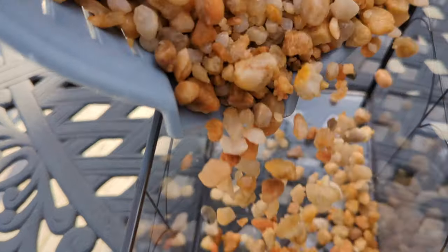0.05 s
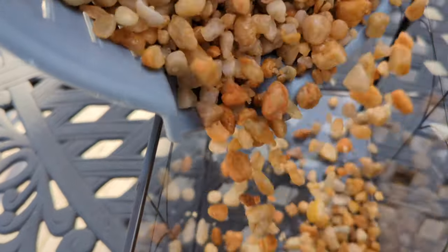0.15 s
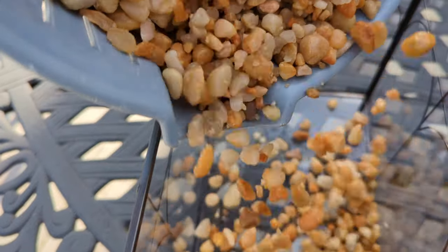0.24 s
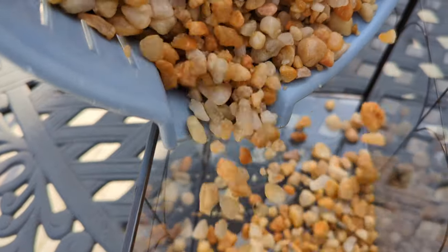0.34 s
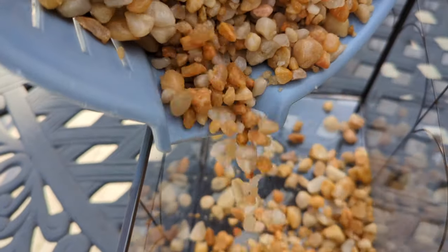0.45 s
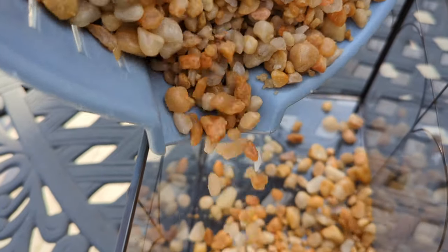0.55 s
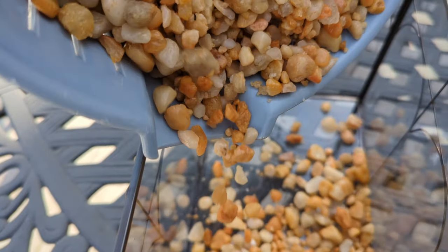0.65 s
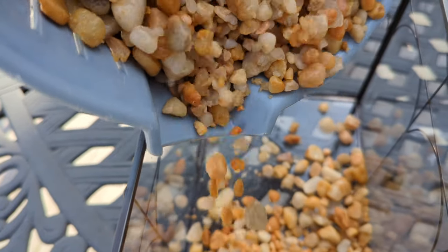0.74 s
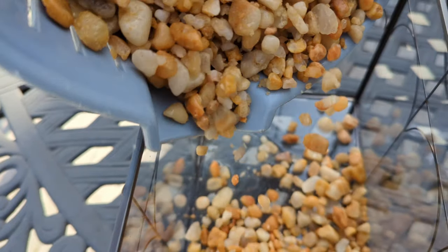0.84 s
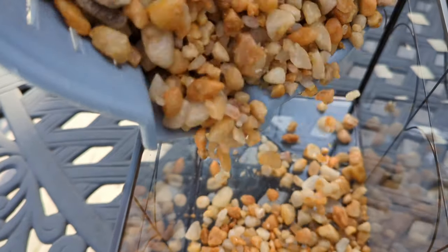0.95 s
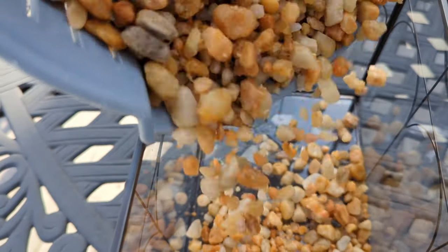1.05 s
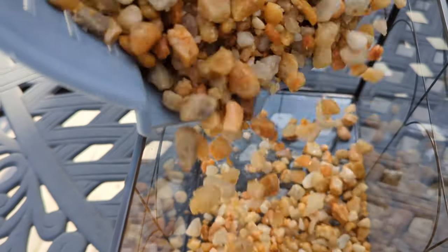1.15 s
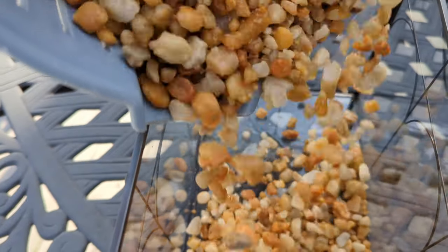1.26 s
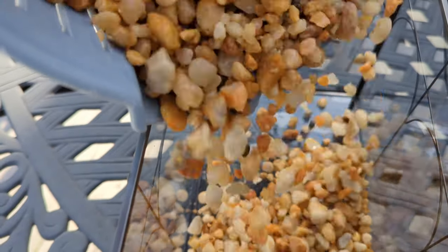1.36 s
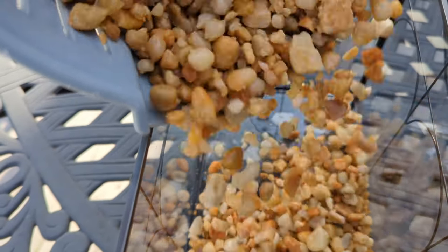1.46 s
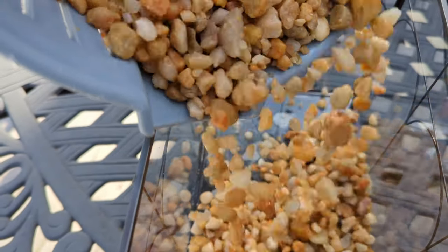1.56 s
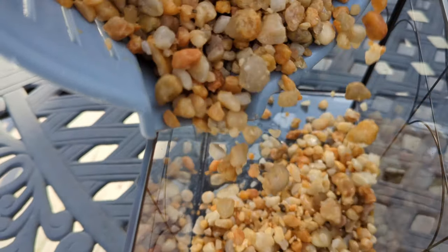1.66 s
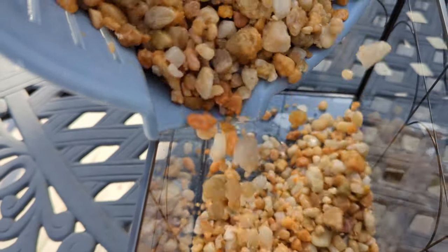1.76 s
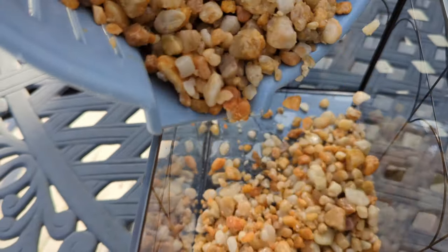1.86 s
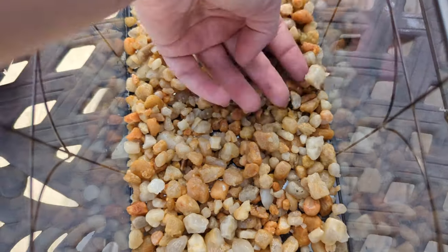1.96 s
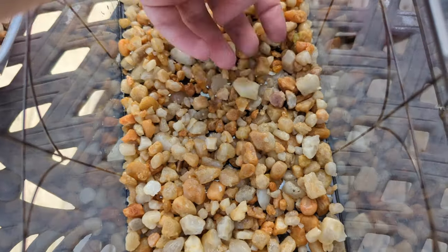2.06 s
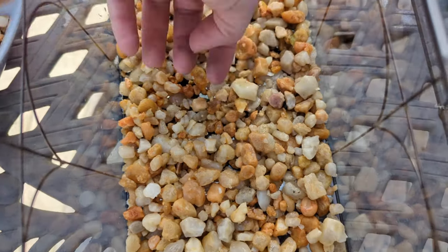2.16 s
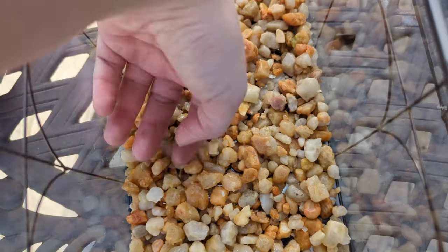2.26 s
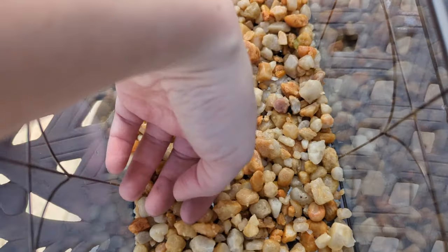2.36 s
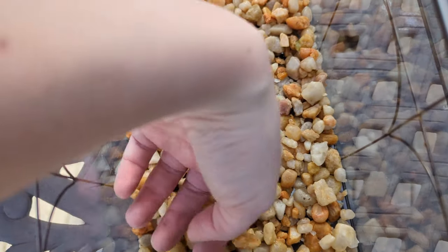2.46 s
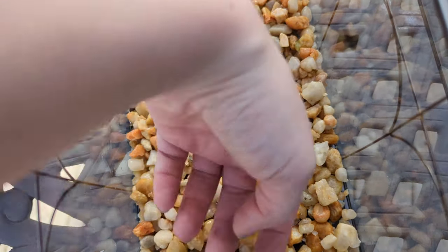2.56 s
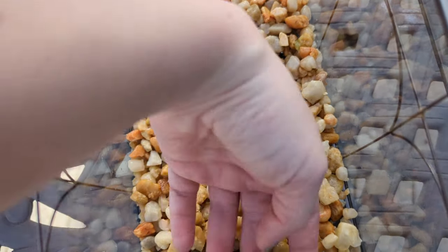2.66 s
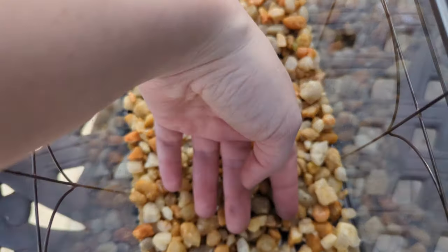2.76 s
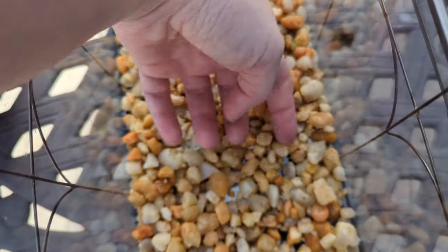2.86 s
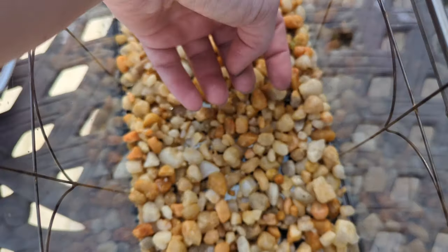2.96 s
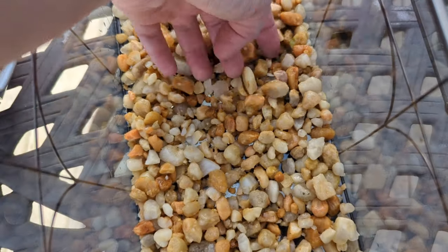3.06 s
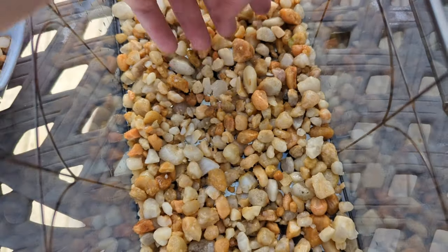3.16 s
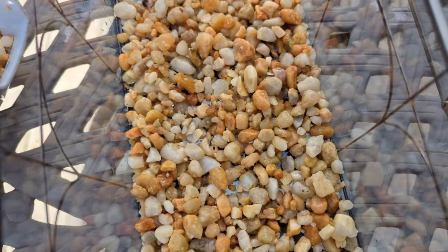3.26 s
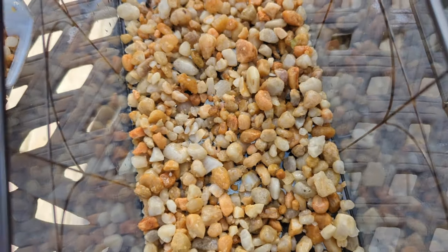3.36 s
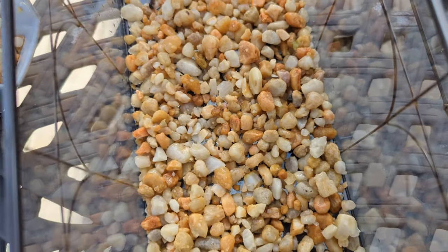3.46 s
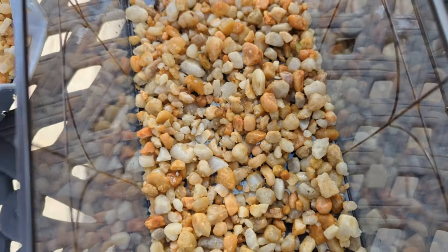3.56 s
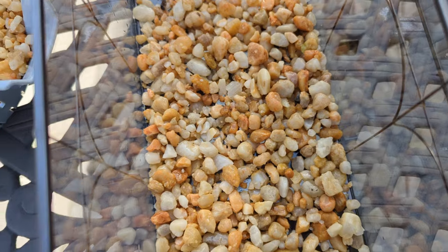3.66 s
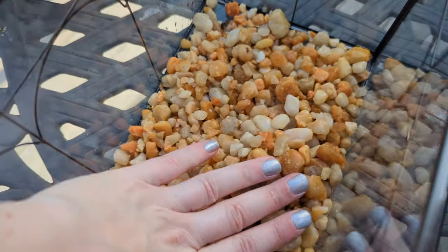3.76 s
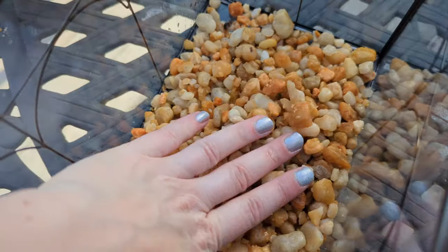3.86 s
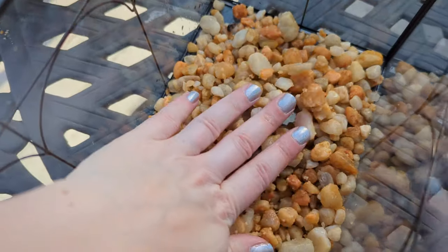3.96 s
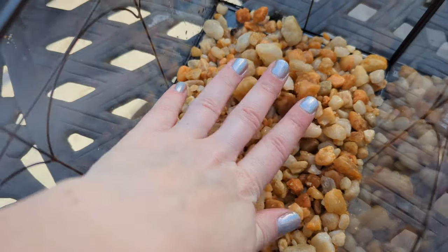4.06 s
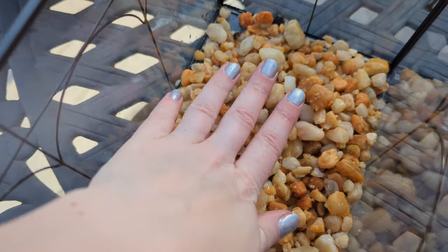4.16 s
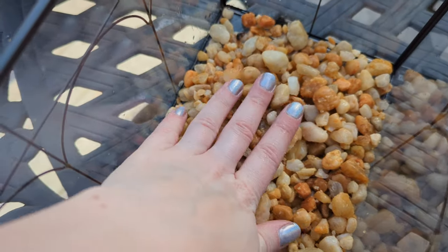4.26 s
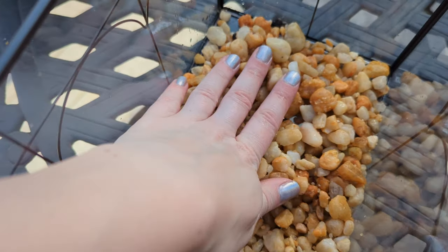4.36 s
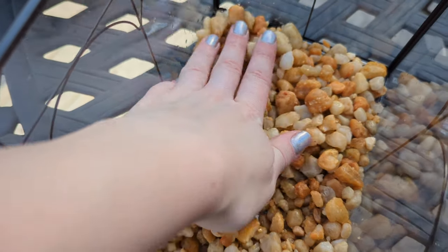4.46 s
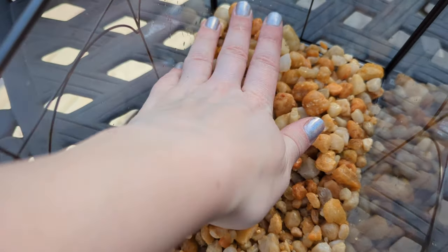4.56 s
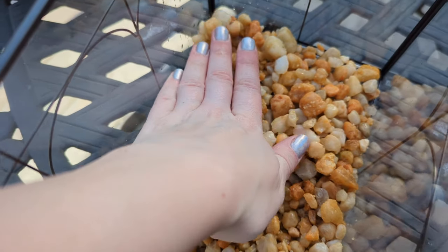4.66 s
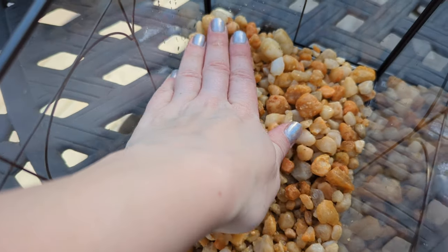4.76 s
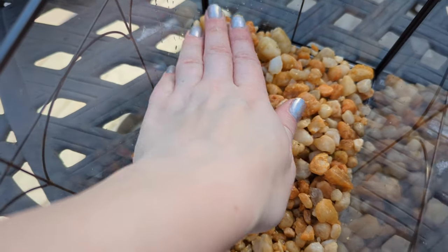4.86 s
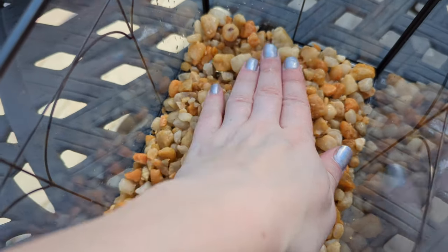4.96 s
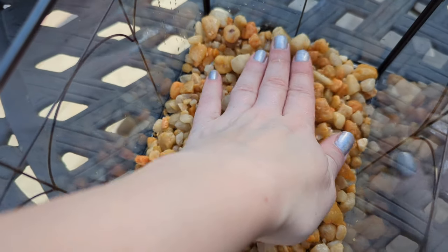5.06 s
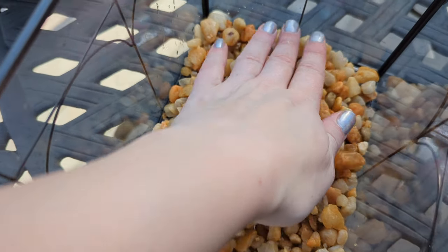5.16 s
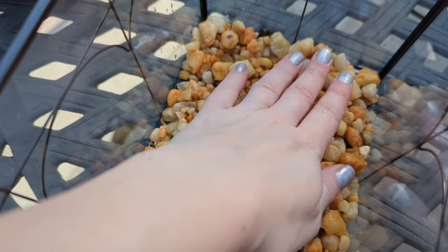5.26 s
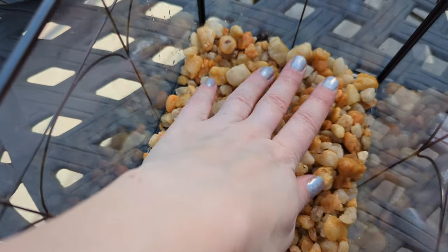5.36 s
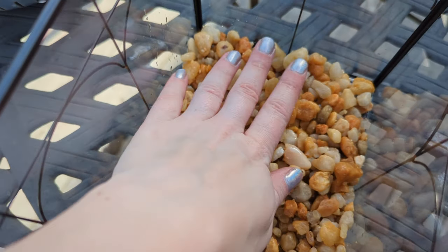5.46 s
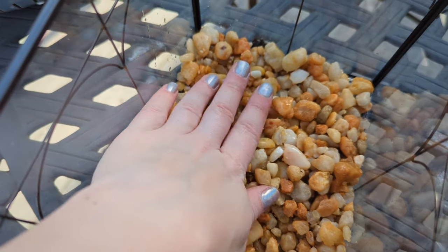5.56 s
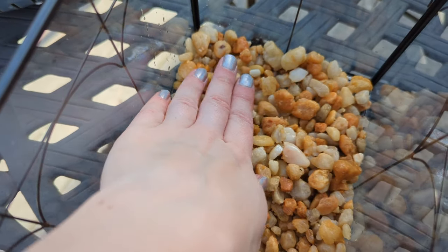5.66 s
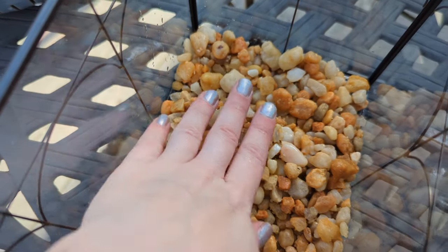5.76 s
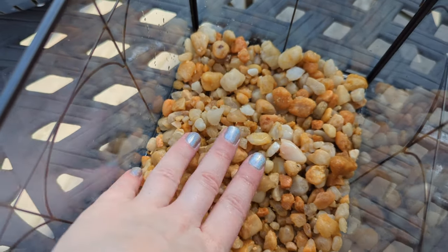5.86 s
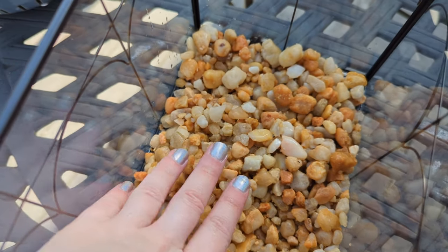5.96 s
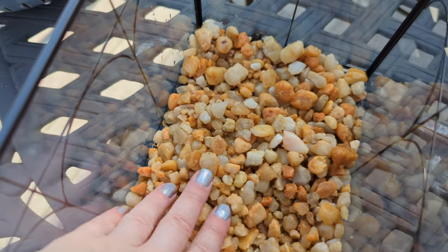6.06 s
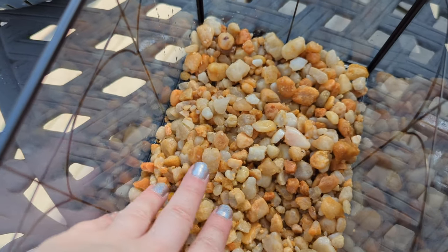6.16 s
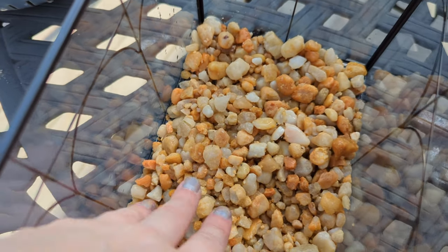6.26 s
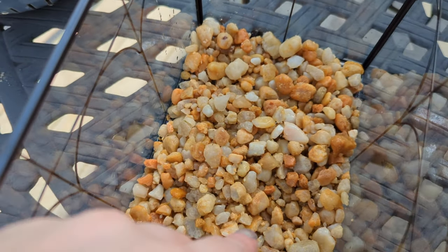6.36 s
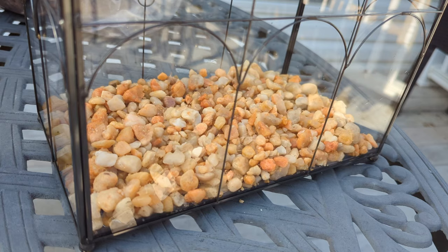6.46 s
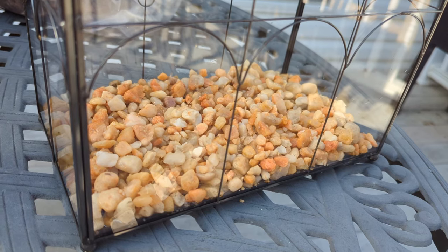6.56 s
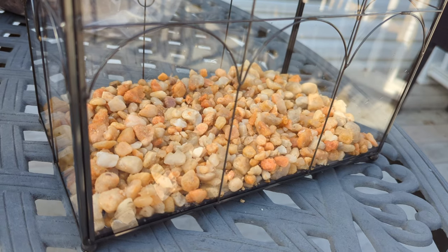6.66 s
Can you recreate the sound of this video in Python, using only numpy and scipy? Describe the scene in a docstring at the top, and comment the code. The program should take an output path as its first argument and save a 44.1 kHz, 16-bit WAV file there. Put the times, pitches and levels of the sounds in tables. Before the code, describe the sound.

A rattling stream of gravel thins, swells and stops, followed by crunchy finger rakes, sharp stone clicks and soft pressing strokes in glass.

```python
"""Pebbles pour from a plastic colander into a glass terrarium on a garden table, close to the microphone. The
stream thins and swells, and its clatter ends at about 2 s; a hand rakes the bed in several strokes and pats it
flat. Each stone contact is a tiny decaying tick, filtered by wall reflections and by the modes of the glass
panes, while the weight of the stones drums on the modes of the base. Coloured noise gives the faint outdoor
air, the table rumble and a hiss; a few thin whistles glide over it."""
import sys
import numpy as np
from scipy import signal
from scipy.fft import rfft, irfft
from scipy.io import wavfile
from scipy.ndimage import uniform_filter1d

SR = 44100
rng = np.random.default_rng(int(sys.argv[2]) if len(sys.argv) > 2 else 0)


def materialize(psi):
    """Save the field psi as 16-bit PCM at rate SR to the path in sys.argv[1].

    A 1-D psi becomes a single channel; in a 2-D psi each row is a channel.
    """
    bounded = np.clip(np.atleast_2d(psi).T, -1, 1)
    quanta = np.round(bounded * 32767).astype(np.int16)
    wavfile.write(sys.argv[1], SR, quanta)


N = 296352

# Spectrum of the outdoor air. Each row: frequency in Hz, gain in dB.
AIR_SPECTRUM = [(60, -12), (110, -2), (200, -17), (450, -14), (800, -27), (1800, -33), (2800, -27),
                (4500, -42), (8500, -44), (16000, -60)]
# Spectrum of the rumble. Each row: frequency in Hz, gain in dB.
RUMBLE_SPECTRUM = [(20, -25.5), (35, -19), (55, 3.5), (100, -20), (180, -26), (400, -59)]
# Spectrum of the unbroken hiss. Each row: frequency in Hz, gain in dB.
HISS_SPECTRUM = [(500, -11), (3000, -2), (5000, -8.5), (8500, -4), (16000, -27)]
# Swells of rumble from the handled tank and table.
# Each row: peak time in seconds, rise in seconds, t60 in seconds, level in dB before RUMBLE_TRIM_DB.
RUMBLE_SWELLS = [(2.0, .5, 0.92, -57.5), (2.64, 0.3, .5, -45), (3.15, 0.46, 1.9, -53.5),
                 (4.02, 0.75, 2.1, -50.5), (4.74, .04, 0.54, -40)]
# Faint gliding whistles, perhaps far birds.
# Each row: start in seconds, length in seconds, first frequency in Hz, last frequency in Hz, level in dB.
WHISTLE_GLIDES = [(3.597, .15, 7800, 9020, -71), (6.471, 0.063, 3040, 2404, -64.5)]
# Modes of the loaded base of the tank. Each row: frequency in Hz, relative level in dB, t60 in seconds.
BASE_MODES = [(145, -13, 0.13), (216.3, -9.5, 0.27), (268, -9, 0.033), (329, -1.5, 0.075),
              (364.7, 1.5, 0.18), (410, 1.5, 0.061), (446.5, -3.5, 0.12)]
# Modes of the glass panes. Each row: frequency in Hz, relative level in dB, t60 in seconds.
PANE_MODES = [(740.4, -19.5, 0.043), (1205, -24, 0.053), (1435, -16.5, 0.073), (2235, -19.5, 0.055),
              (2440, -18.5, 0.05), (3280, -16, 0.024), (4940, -17, 0.061), (5243, -11.5, 0.044),
              (6477, -7.5, 0.018), (8260, -8, 0.014), (11330, -11, 0.012)]
# Soft pushes that make the tank hum.
# Each row: start in seconds, frequency in Hz, peak level in dB, rise in seconds, t60 in seconds.
SOFT_PUSHES = [(0.035, 120, -31, 0.011, 0.12), (3.469, 347, -29.5, 0.0096, 0.081),
               (3.468, 1310, -48.5, 0.0037, 0.045), (5.241, 222, -24.5, 0.005, 0.1),
               (6.371, 362, -36.5, 0.053, 0.091)]
# Big stones, falling or pushed by the hand, that thump on the base. Each row: time in seconds, level in dB.
BASE_THUMPS = [(.18, -28.5), (.334, -26), (0.353, -30.5), (.435, -31), (0.446, -28.5), (.508, -43),
               (1.225, -24.5), (1.765, -22.5), (1.858, -25), (3.472, -42.5), (5.244, -36.5), (6.401, -45)]
# Stones that slip and snap against a neighbour or the glass.
# Each row: time in seconds, level in dB, extra low end in dB.
STONE_SNAPS = [(2.103, -29, -1.5), (2.165, -42, -11), (2.258, -40, -13), (2.29, -43, -4), (2.359, -35, -1),
               (2.382, -37, -13.5), (2.664, -48, -2), (2.696, -39, -7.5), (2.783, -28.5, 3),
               (2.866, -12.5, -6), (2.914, -17, -10), (2.953, -15, -2.5), (3.069, -30.5, -14),
               (3.114, -23.5, -20), (3.132, -19, -23), (3.318, -49, 1), (4.392, -29, -5), (4.582, -24, -26),
               (4.608, -24.5, 7), (4.649, -30.5, 1), (4.695, -39, -6), (4.712, -27, 4), (4.923, -34, -0.5),
               (5.036, -19.5, 13), (5.154, -13, -22), (5.28, -32, -7), (5.462, -22, 1), (5.548, -31.5, -3),
               (5.802, -22.5, 6), (5.838, -31.5, 3), (6.218, -43, -1), (6.26, -46.5, 0), (6.284, -44.5, -3),
               (6.467, -47.5, 10)]
# Bigger stones that clack out of the stream. Each row: time in seconds, level in dB.
BIG_DROPS = [(.003, -13), (.032, -10), (.07, -20.5), (.183, -17), (.205, -17), (.226, -21.5), (.287, -13.5),
             (.332, -13.5), (.352, -13.5), (.373, -17.5), (.389, -24), (.403, -21.5), (.422, -18),
             (.446, -13.5), (.49, -23), (.503, -10.5), (.514, -18), (.546, -18), (.585, -21.5),
             (.613, -17.5), (.638, -15.5), (.669, -15), (.681, -16), (.704, -19.5), (.76, -15),
             (.777, -14.5), (.817, -15.5), (.841, -16.5), (.872, -17.5), (.925, -17), (.962, -18.5),
             (1.012, -13), (1.041, -12), (1.094, -16), (1.136, -15), (1.171, -19.5), (1.194, -15.5),
             (1.208, -14), (1.246, -15), (1.273, -17), (1.316, -15), (1.36, -27), (1.391, -15.5),
             (1.422, -24), (1.451, -15), (1.635, -15), (1.69, -28), (1.716, -15), (1.777, -12.5),
             (1.829, -14), (1.86, -18.5), (1.895, -13.5), (1.934, -24.5), (1.958, -21.5)]
# The flat hand presses and smooths, and in the long faint row just rests on the bed.
# Each row: start in seconds, rise in seconds, push in seconds, level in dB as the push begins,
# level in dB as it ends, t60 of the fall in seconds, extra dB below 2500 Hz.
PAT_STROKES = [(3.799, .044, .238, -21, -21, .27, -2.5), (3.8, .2, 2.09, -49, -57, .3, 0),
               (4.297, .11, .118, -17.5, -19.5, .22, -4), (4.59, .025, .04, -39, -41, .2, -4),
               (4.688, .023, .012, -29.5, -29.5, .22, 8), (4.755, .05, .025, -32.5, -32.5, .33, 1),
               (4.993, .045, .15, -22, -25.5, .2, 1.5), (5.338, .027, .105, -25.5, -28, .14, 0.5),
               (5.6, .028, .012, -26, -27, .19, 2.5), (5.68, .04, .014, -35.5, -35, .16, 0),
               (5.786, .02, .035, -44, -44, .12, -4), (5.866, .02, .02, -23, -23.5, .19, -4.5),
               (5.97, .03, .02, -47.5, -48, .15, -10.5), (6.09, .03, .035, -36, -34.5, .19, -1.5),
               (6.35, .04, .035, -48, -51, .14, -8)]
# Fingers rake through the bed. Each row: the same seven columns and units as PAT_STROKES.
RAKE_STROKES = [(1.955, .05, .028, -16, -14, .19, 2), (2.135, .025, .035, -36, -39.5, .15, 0),
                (2.353, .028, .12, -18.5, -18.5, .26, 0.5), (2.768, .018, .125, -20.5, -14.5, .2, -0.5),
                (2.96, .02, .04, -36, -38, .5, 5), (3.098, .018, .095, -21, -28.5, .1, 2),
                (3.45, .018, .008, -54.5, -53.5, .1, -13)]
# The stream from the colander thins, swells again, and its clatter ends at about 2 s. # Each row: time in
# seconds, clatter in dB, extra dB below 2500 Hz as heavier stones move.
POUR_FLOW = [(0, -17.5, 1), (.42, -18, -2), (.6, -27, 4), (.68, -26, -4.5), (.73, -27, -1),
             (.78, -26.5, -1), (.807, -32, -1), (.87, -27.5, -3.5), (.93, -22.5, -0.5), (1.03, -30, 3.5),
             (1.06, -22.5, 3.5), (1.13, -26.5, 7.5), (1.2, -20.5, -1), (1.42, -19, -0.5),
             (1.74, -17.5, -1.5), (1.81, -25, 5.5), (1.88, -23.5, 1.5), (1.99, -25.5, 6)]
# Spectrum of pressed stones. Each row: frequency in Hz, gain in dB.
PAT_SPECTRUM = [(290, -24.5), (500, 2), (613, -8), (750, -3.5), (893, -0.5), (1900, -3), (2380, -0.5),
                (2800, -2), (4030, -5.5), (6610, -6), (9920, -13), (11700, -12.5), (16000, -21)]
# Spectrum of raked stones. Each row: frequency in Hz, gain in dB.
RAKE_SPECTRUM = [(290, -38), (500, -4), (613, -13.5), (784, -8), (1300, -7.5), (3540, -4.5), (4150, -6),
                 (4600, -6), (6610, -3.5), (8400, -6), (9850, -16), (11500, -11), (13600, -16),
                 (16000, -24.5)]
# Spectrum of falling stones. Each row: frequency in Hz, gain in dB.
POUR_SPECTRUM = [(290, -40), (500, -25), (698, -32), (795, -8), (906, -17.5), (1440, -9.5), (1670, -13.5),
                 (2230, -8.5), (4210, -7), (5310, -3.5), (8090, -3), (9800, -8), (11600, -5),
                 (16000, -15.5)]
# Left minus right at the two microphone ports. Each row: frequency in Hz, difference in dB.
PORT_DIFFERENCE = [(60, -3), (110, 1.5), (200, 1.5), (380, 2.5), (700, 4.5), (1290, 4), (2380, 4.5),
                   (4400, -3.5), (8120, -3), (15000, 5.5)]

TIME = np.arange(N) / SR
TOP_HZ = 15800  # highest tick pitch, and the final cutoff
SPOTS = 5  # places where the stones of one layer strike
AIR_DB, HISS_DB, RUMBLE_FLOOR_DB, RUMBLE_TRIM_DB = -57, -76.5, -68.5, -3
# the air and the rumble drop away at the end: moment, length and depth
HUSH_S, HUSH_FALL_S, HUSH_DB = 6.52, .032, -29
FLUTTER_HZ = 50  # cutoff of the noise that modulates the whistles
MODE_SPREAD = .018  # the shifting load of stones detunes each mode by about this share
CLACK_S = .007  # scales the energy of a single blow
FIRM_DB = -20  # clatter of a firm push or a steady stream
PUSH_CURVE = 1.3  # stones start moving as this power of time
SETTLE_DB, SETTLE_T60_S = -23, .55  # loose stones trickle on after each stroke
DULL_DB_PER_S, DULL_MAX_DB = 19, 13  # a stroke reaches deeper, heavier stones as it goes on
# single ticks after a stroke, relative to its end
LOOSE_DB, LOOSE_SCATTER_DB, LOOSE_SPAN_S = -12, 2.5, .22
STREAM_CLACKS_PER_S, STREAM_CLACK_DB, STREAM_SCATTER_DB = 47, -3.5, 4  # rate is at full flow
STONE_SIZE_DB = 2  # stones differ in size, and so in the weight of their low end
# the base drums with the stream, and more as the tank fills
POUR_DRUM_DB, POUR_DRUM_FOLLOW, FILL_DB_PER_S = -45.5, 1.5, 5.5


def undb(db):
    """Amplitude gain is a power of ten in decibels over twenty."""
    return 10 ** (np.asarray(db) / 20)


def curve(rows, axis=1):
    """An envelope interpolated linearly in dB, from one column; silent outside the rows."""
    rows = np.array(rows)
    return undb(np.interp(TIME, rows[:, 0], rows[:, axis], left=-200, right=-200))


def unit(x):
    """Signal energy is the sum of squares, here normalised to one."""
    return x / np.sqrt(np.sum(x ** 2, axis=-1, keepdims=True))


def fade(t, t60):
    """Damping makes amplitude decay exponentially, by 60 dB in t60 seconds."""
    return np.exp(-np.log(1000) * t / t60)


def butter(x, order, hz, kind="low"):
    """A recursive Butterworth filter passes one side of its cutoff with a flat response."""
    return signal.sosfilt(signal.butter(order, hz, kind, fs=SR, output="sos"), x)


def lows(x, order, hz):
    """Filtering forwards and backwards extracts the lows without a phase shift."""
    return signal.sosfiltfilt(signal.butter(order, hz, fs=SR, output="sos"), x)


def colour(x, points, size=2048):
    """A minimum-phase filter through (Hz, dB) points, obtained by folding the cepstrum into a causal one."""
    hz, db = np.transpose(points)
    log_hz = np.log(np.fft.rfftfreq(size, 1 / SR) + 1)
    log_gain = np.log(undb(np.interp(log_hz, np.log(hz), db)))
    cepstrum = irfft(log_gain)[:size // 2]
    cepstrum[1:] *= 2
    response = irfft(np.exp(rfft(cepstrum, size)))
    return signal.fftconvolve(np.atleast_2d(x), response[None], axes=1)[:, :x.shape[-1]]


def wash(points, apart):
    """A diffuse field: coloured noise at unit level, partly correlated between the two ports."""
    noise = colour(rng.standard_normal((3, N)), points, size=8192)
    ears = noise[2] + apart * noise[:2]
    return ears / ears.std()


def background():
    """Broadband outdoor air and the low rumble of the handled tank and table; both drop at the end."""
    shake = undb(RUMBLE_FLOOR_DB)
    for s, rise, t60, db in RUMBLE_SWELLS:
        swell = np.clip(1 + (TIME - s) / rise, 0, 1) ** 2
        shake = shake + undb(db) * swell * fade(np.maximum(TIME - s, 0), t60)
    hush = undb(HUSH_DB * np.clip((TIME - HUSH_S) / HUSH_FALL_S, 0, 1))
    air = undb(AIR_DB) * wash(AIR_SPECTRUM, .82)
    rumble = undb(RUMBLE_TRIM_DB) * shake * wash(RUMBLE_SPECTRUM, .59)
    return hush * (air + rumble)


def whistles():
    """Gliding sines swell and fade; modulation by slow noise widens each into a thin, airy band."""
    out = 0
    flutter = butter(rng.standard_normal(N), 2, FLUTTER_HZ)
    for s, length, start_hz, end_hz, db in WHISTLE_GLIDES:
        along = np.clip((TIME - s) / length, 0, 1)
        phase = 2 * np.pi * np.cumsum(start_hz + (end_hz - start_hz) * along) / SR
        out = out + undb(db) * np.sin(np.pi * along) * np.sin(phase)
    return out * flutter / flutter.std()


def ring(modes, t):
    """Modal superposition: damped sines, each of random sign and slightly detuned by the load of stones."""
    out = 0
    for (hz, db, t60), (detune, side) in zip(modes, rng.standard_normal((len(modes), 2))):
        mode_hz = hz * (1 + MODE_SPREAD * detune)
        mode = unit(np.sin(2 * np.pi * mode_hz * t) * fade(t, t60))
        out = out + undb(db) * mode * np.sign(side)
    return out


def knock(size):
    """Impulse response of the base, which is too small to radiate deep bass."""
    return unit(butter(ring(BASE_MODES, np.arange(size) / SR), 2, 120, "high"))


def thuds():
    """A slow force excites a single tone of the tank, which swells and then decays freely."""
    out = 0
    for s, hz, db, rise, t60 in SOFT_PUSHES:
        t = np.maximum(TIME - s, 0)
        envelope = np.minimum(t / rise, 1) * fade(np.maximum(t - rise, 0), t60)
        out = out + undb(db) * envelope * np.sin(2 * np.pi * hz * t)
    return out


def thumps(size=9000):
    """An impulsive blow excites all modes of the base at once, one blow for each big stone."""
    out = np.zeros(N)
    for s, db in BASE_THUMPS:
        at = int(s * SR)
        out[at:at + size] += undb(db) * np.sqrt(CLACK_S * SR) * knock(size)
    return out


def base(times, sizes, size=9000):
    """Linear superposition: the base answers each stone's blow, with a different response at each spot."""
    out = np.zeros(N)
    for spot in range(SPOTS):
        blows = np.bincount((times[spot::SPOTS] * SR).astype(int), sizes[spot::SPOTS], N)[:N]
        out += signal.oaconvolve(blows, knock(size))[:N]
    return out


def ticks(count, ring_s, size=160):
    """Small hard stones ring and decay within milliseconds, each tick with its own pitch and length."""
    pitch, length, phase = rng.random((count, 3)).T[:, :, None]
    t = np.arange(size) / SR
    return unit(np.cos(2 * np.pi * (TOP_HZ * pitch * t + phase)) * fade(t, ring_s * (.59 + length)))


def tank(points, t60, lag_ms, late_db, size=6000):
    """Impulse response from one spot to both ports: direct tick, dense wall reflections and ringing panes."""
    t = np.arange(size) / SR
    decay = fade(t, t60) + undb(late_db) * fade(t, .37)
    walls = unit(rng.standard_normal((3, size)) * decay)
    # long waves reach both ports alike, short ones differ
    separate = colour(walls[:2], [(300, -8), (1000, -3), (2500, 5.5)])
    left, right = walls[2] + ring(PANE_MODES, t) + separate
    # the walls answer the right port a little later; the bright direct tick comes from straight ahead
    lag = int(lag_ms / 1000 * SR * rng.uniform(.7, 1.3))
    reflected = np.array([left, np.pad(right, (lag, 0))[:size]])
    direct = colour((t == 0) * 1., [(1500, -7), (5000, 1)])
    return unit(colour(direct + reflected, points))


def loose(rows, count=5):
    """Relaxation of the bed: after each stroke stones topple one by one, on average ever more softly."""
    toppling = []
    for s, rise, push, _, last_db, _, low_db in rows:
        waits = LOOSE_SPAN_S * (np.arange(count) + rng.random(count)) / count
        levels = last_db + LOOSE_DB + 20 * np.log10(fade(waits, SETTLE_T60_S))
        levels = levels + LOOSE_SCATTER_DB * rng.uniform(-1, 1, count)
        for wait, db in zip(waits, levels):
            toppling.append((s + rise + push + wait, db, low_db - 10 * rng.random()))
    return [row for row in toppling if row[0] < TIME[-1]]


def falling():
    """Impact rate follows the flow: listed big stones plus random ones, each with its own low-end weight."""
    s, flow_db, heavy_db = np.transpose(POUR_FLOW)
    busy = np.cumsum((curve(POUR_FLOW) / undb(flow_db.max())) ** 2) * STREAM_CLACKS_PER_S / SR
    wait, size = rng.random((int(busy[-1]), 2)).T
    times = np.interp(np.arange(len(wait)) + wait, busy, TIME)
    levels = np.interp(times, s, flow_db) + STREAM_CLACK_DB + STREAM_SCATTER_DB * (2 * size - 1)
    rows = []
    for at, db in [*BIG_DROPS, *zip(times, levels)]:
        low_db = np.interp(at, s, heavy_db) / 2 + STONE_SIZE_DB * rng.uniform(-1.9, 1)
        rows.append((at, db, low_db))
    return rows


def clacks(rows, points, bounce_s, rebound, t60, lag_ms, gain_db, base_db, count=6, size=4096):
    """Inelastic bouncing: each hit chatters to rest; heavier stones sound lower and duller."""
    out = np.zeros((2, N + size))
    spots = [tank(points, t60, lag_ms, late_db=-30, size=size) for _ in range(2 * SPOTS)]
    for n, (s, db, low_db) in enumerate(rows):
        chatter = np.zeros(size)
        for k, tick in enumerate(ticks(count, .00015)):
            at = int(bounce_s * SR * max(k - rng.random(), 0))
            chatter[at:at + len(tick)] += tick * rebound ** k
        chatter = colour(chatter, [(1800, low_db), (4000, .0037), (9000, -np.clip(low_db, 0, 8))])
        in_tank = unit(signal.fftconvolve(chatter, spots[n % len(spots)], axes=1)[:, :size])
        hit = in_tank + undb(base_db) * knock(size)
        at = int(s * SR)
        out[:, at:at + size] += undb(db + gain_db) * np.sqrt(CLACK_S * SR) * hit
    return out[:, :N]


def steady(x, span_s):
    """Power normalisation over a short span holds a random rattle near one and leaves its finer grain."""
    power = uniform_filter1d(np.mean(np.atleast_2d(x) ** 2, axis=0), int(span_s * SR))
    power = uniform_filter1d(power, int(span_s * SR / 2))
    return x / np.sqrt(np.abs(power) + np.mean(x ** 2) / 1000)


def strokes(rows, drum_db, drum_follow):
    """Driven motion: strokes rise, push, fall and settle; drumming is drum_db at FIRM_DB, a power of clatter."""
    clatter, heavy = 1e-9, 1e-9  # keeps the ratio below finite
    for s, rise, push, first_db, last_db, t60, low_db in rows:
        t = np.maximum(TIME - s, 0)
        after = np.maximum(t - rise - push, 0)
        push_gain = undb(np.interp(t, [rise, rise + push], [first_db, last_db]))
        force = np.minimum(t / rise, 1) ** PUSH_CURVE * push_gain
        moving = force * np.maximum(fade(after, t60), undb(SETTLE_DB) * fade(after, SETTLE_T60_S))
        clatter = clatter + moving
        heavy = heavy + moving * undb(low_db + np.minimum(DULL_DB_PER_S * t, DULL_MAX_DB))
    return clatter, heavy / clatter, undb(drum_db) * (clatter / undb(FIRM_DB)) ** drum_follow


def stream():
    """Granular flow as three gains: clatter, weight of the heavier stones, and drumming of the base."""
    clatter = curve(POUR_FLOW)
    drum = undb(POUR_DRUM_DB + FILL_DB_PER_S * TIME) * (clatter / undb(FIRM_DB)) ** POUR_DRUM_FOLLOW
    return clatter, curve(POUR_FLOW, axis=2), drum


def gravel(motion, points, rate, scatter_db, jostle_s, ring_s, t60, lag_ms, clatter_db, boom_db, span_s, count=6):
    """Random collisions come more often the faster stones move; each jostles a few neighbours."""
    clatter, heavy, drum = motion
    # rate is in collisions per second at the strongest motion
    busy = np.cumsum(rate * np.sqrt(clatter / clatter.max())) / SR
    starts = np.interp(np.sort(rng.random(int(busy[-1]))) * busy[-1], busy, TIME)
    weight = undb(scatter_db * np.clip(rng.standard_normal((len(starts), 1)), -2, 2))
    # the first contact has no wait; its neighbours follow, the later the weaker
    wait = rng.exponential(1, (len(starts), count)) * (np.arange(count) > 0)
    times = (starts[:, None] + jostle_s * wait).ravel()
    sizes = (weight * np.exp(-wait / 2) * rng.standard_normal(wait.shape)).ravel()
    grains = ticks(len(times), ring_s) * sizes[:, None]
    places = (times * SR).astype(int)[:, None] + np.arange(grains.shape[1])
    in_tank = 0
    for spot in range(SPOTS):
        contacts = np.bincount(places[spot::SPOTS].ravel(), grains[spot::SPOTS].ravel(), N)[:N]
        response = tank(points, t60, lag_ms, late_db=-10)
        in_tank = in_tank + signal.oaconvolve(contacts[None], response, axes=1)[:, :N]
    # heavier stones, deeper in the bed, crunch lower
    rattle = steady(in_tank + (heavy - 1) * lows(in_tank, 2, 2500), span_s)
    # boom_db weights the lowest modes of the base, which a broad load favours
    body = base(times, sizes)
    body = body + (undb(boom_db) - 1) * lows(body, 3, 260)
    return undb(clatter_db) * clatter * rattle + drum * steady(body, .07)


def scene():
    """Superposition of the background, the single impacts, the patting, the raking and the pour."""
    air = background() + whistles() + undb(HISS_DB) * wash(HISS_SPECTRUM, .94)
    snaps = clacks(STONE_SNAPS + loose(RAKE_STROKES + PAT_STROKES), PAT_SPECTRUM, bounce_s=.0006, rebound=.74,
                   t60=.013, lag_ms=.2, gain_db=.5, base_db=-20)
    drops = clacks(falling(), POUR_SPECTRUM, bounce_s=.0011, rebound=.84,
                   t60=.018, lag_ms=.22, gain_db=0, base_db=-18)
    patting = strokes(PAT_STROKES, drum_db=-33, drum_follow=.76)
    pat = gravel(patting, PAT_SPECTRUM, rate=650, scatter_db=2, jostle_s=.002, ring_s=.0014,
                 t60=.11, lag_ms=.21, clatter_db=1.5, boom_db=4.5, span_s=.019)
    raking = strokes(RAKE_STROKES, drum_db=-35.5, drum_follow=.56)
    rake = gravel(raking, RAKE_SPECTRUM, rate=800, scatter_db=2.5, jostle_s=.002, ring_s=.0025,
                  t60=.048, lag_ms=.3, clatter_db=.5, boom_db=4, span_s=.01)
    pour = gravel(stream(), POUR_SPECTRUM, rate=480, scatter_db=3, jostle_s=.002, ring_s=.0016,
                  t60=.087, lag_ms=.22, clatter_db=3, boom_db=-4.5, span_s=.019)
    return air + thuds() + thumps() + snaps + drops + pat + rake + pour


def record(dry):
    """Reception: each port has its own response, saturation rounds the peaks and a low-pass cuts the top."""
    hz, db = np.transpose(PORT_DIFFERENCE)
    ears = []
    for x, side in zip(dry, (1, -1)):
        ears.append(colour(x, np.column_stack([hz, side * db / 2])))
    ears = np.vstack(ears)
    ears = ears / (1 + (ears / .9) ** 4) ** .25
    return signal.sosfilt(signal.ellip(10, .2, 70, TOP_HZ, fs=SR, output="sos"), ears)


dry = scene()
out = record(dry)
materialize(out)
```